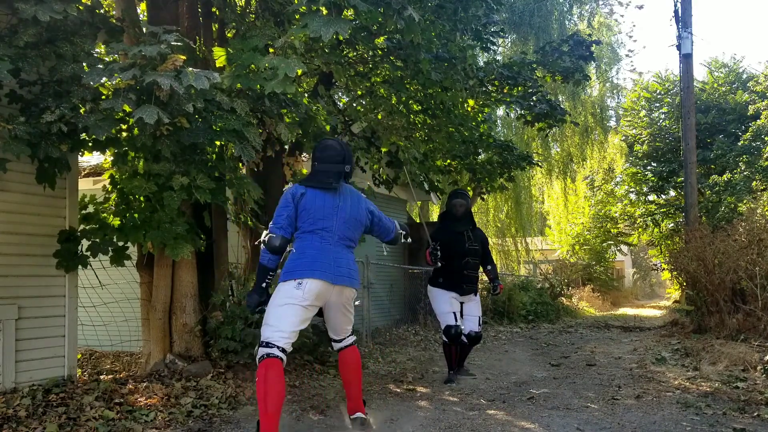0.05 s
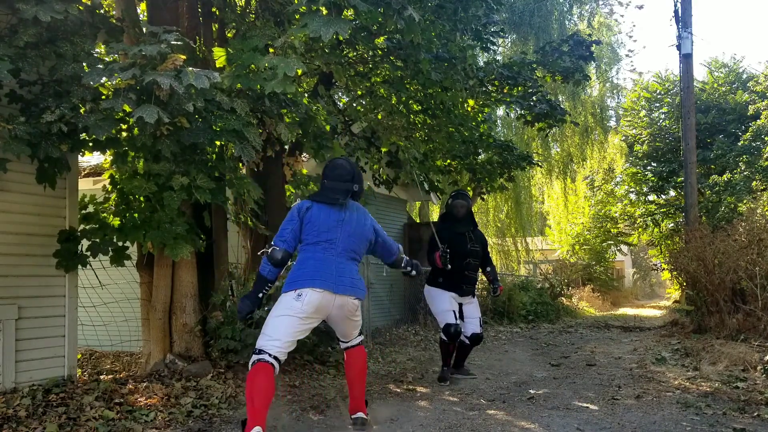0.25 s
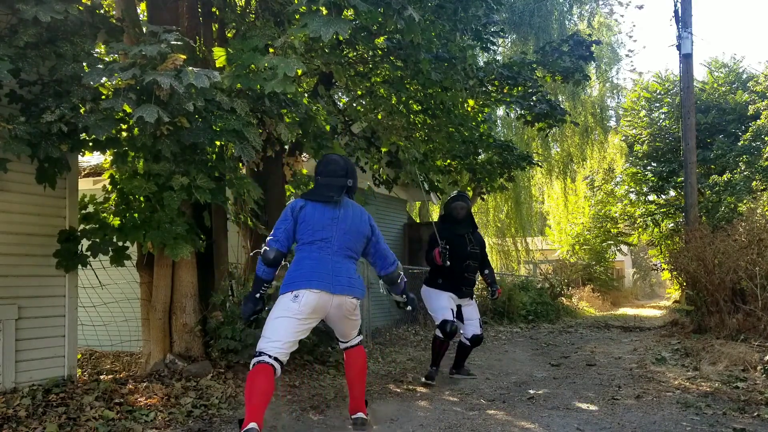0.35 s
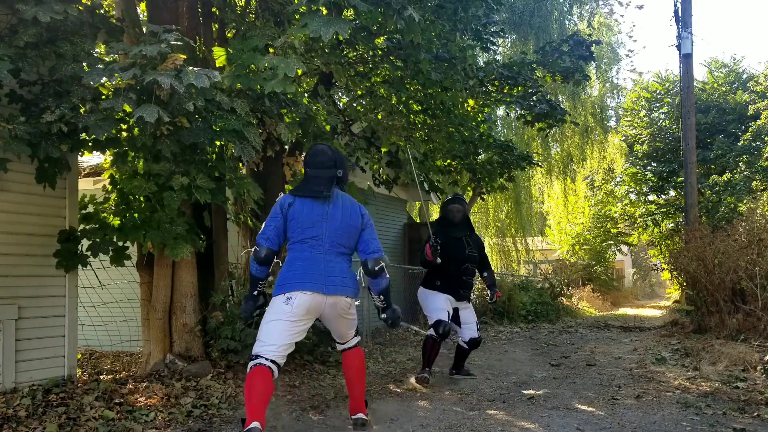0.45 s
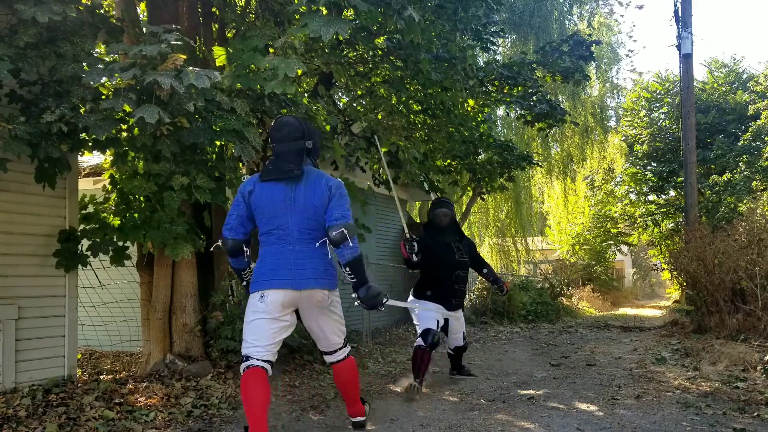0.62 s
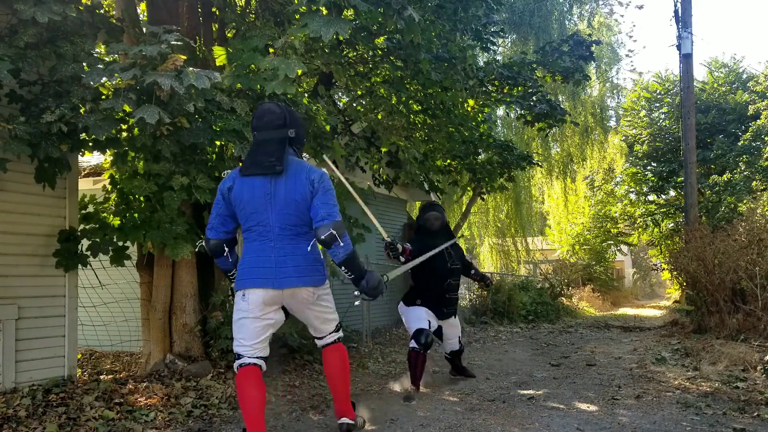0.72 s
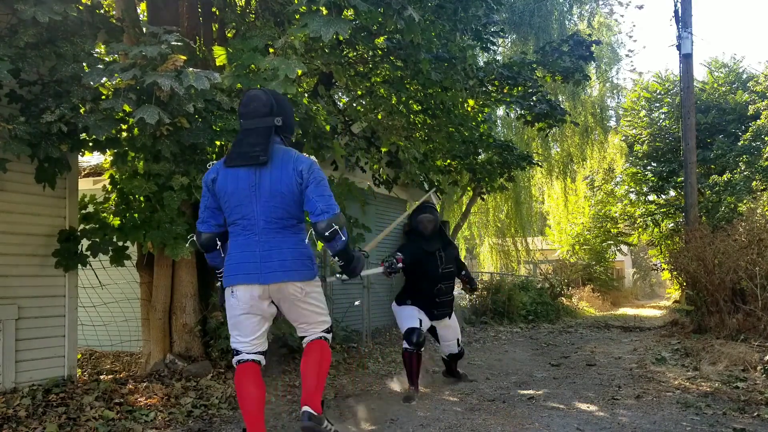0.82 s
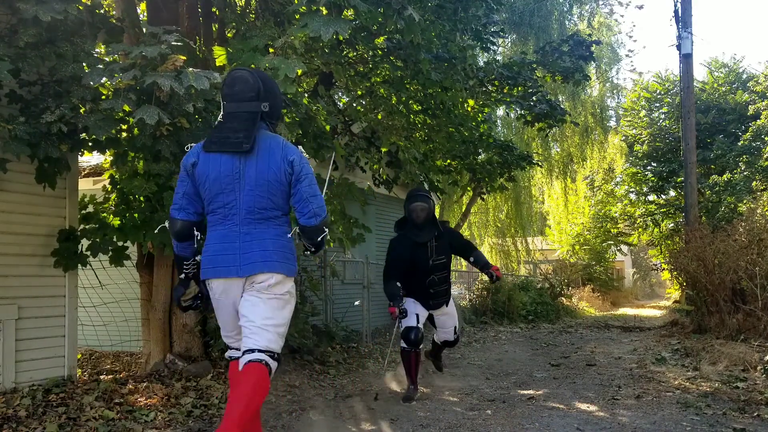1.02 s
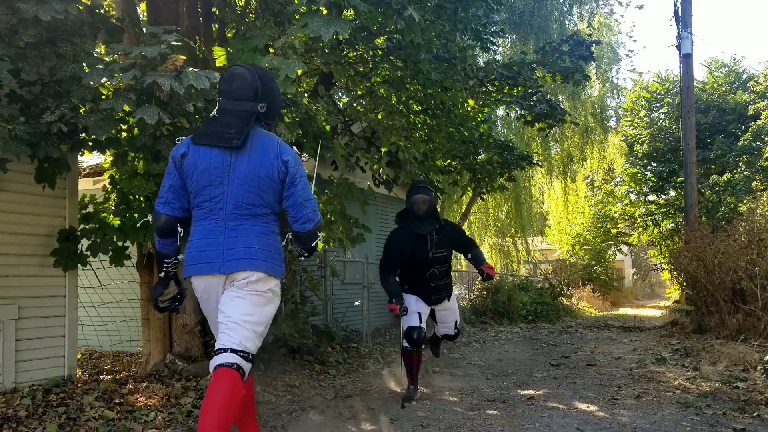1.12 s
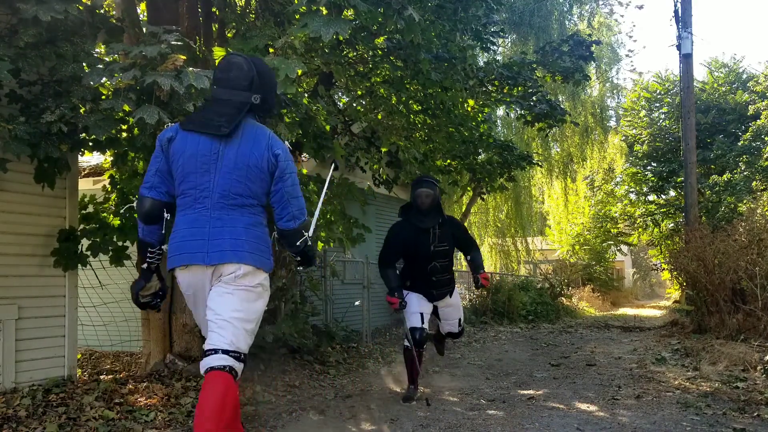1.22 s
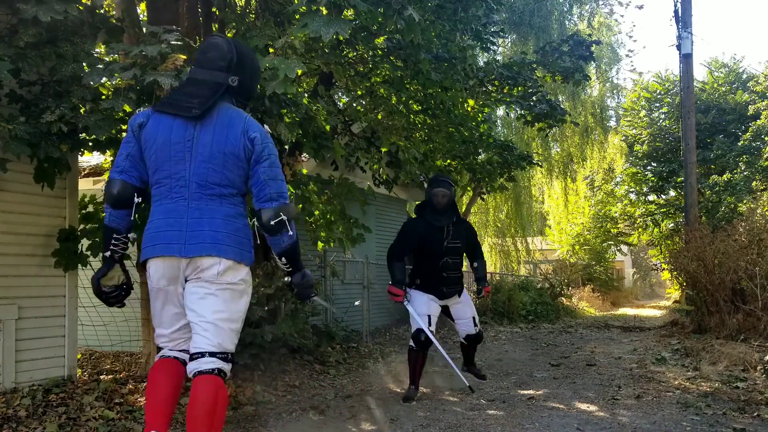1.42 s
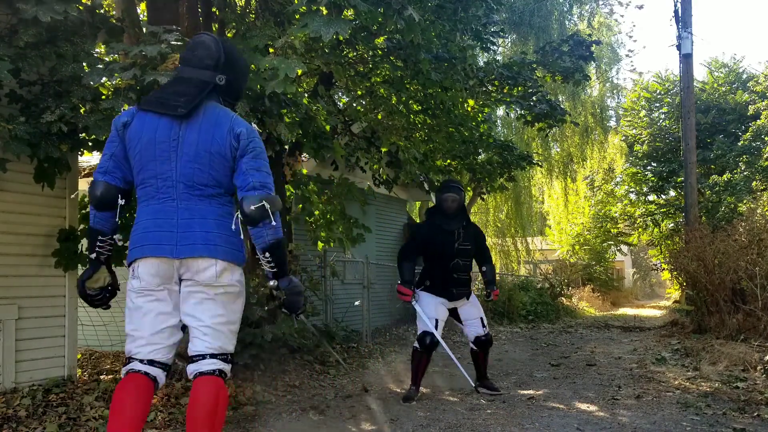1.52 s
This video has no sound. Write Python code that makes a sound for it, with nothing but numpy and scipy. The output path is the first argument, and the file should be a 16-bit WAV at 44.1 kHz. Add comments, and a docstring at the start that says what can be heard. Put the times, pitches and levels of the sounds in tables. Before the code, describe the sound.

A sword blade cracks sharply against another sword's guard, ringing briefly with a short echo. Soft footsteps then thud and scuff on gritty dirt, a little way off in a quiet yard with a faint distant hum.

```python
"""Two fencers spar in a dirt yard. A low distant hum and faint outdoor air are there throughout.
First the gear ticks and a shoe lands. At 0.2 s one blade cracks against the other's guard in a quick
run of five contacts; a padded glove thumps, the steel rings briefly, and fence, wall and trees echo.
From about 0.5 s on, shoes thud and scuff on the grit, pebbles snap and the gear ticks again."""
import sys
import numpy as np
from scipy import signal
from scipy.fft import rfft, irfft, next_fast_len
from scipy.io import wavfile
from scipy.ndimage import map_coordinates

SR = 44100
rng = np.random.default_rng(int(sys.argv[2]) if len(sys.argv) > 2 else 0)


def master(y):
    """Save y as 16-bit WAV."""
    cut = np.clip(np.atleast_2d(y).T, -1, 1)
    pcm = np.round(cut * 32767)  # scale
    wavfile.write(sys.argv[1], SR, pcm.astype(np.int16))


N = 68355
TOP_HZ = 14750  # where the treble ends
SNAP_RISE_S = 0.00058  # how fast ticks, pebbles and cracks swell


def amp(db):
    """Turn decibels into a number to multiply by."""
    return 10 ** (np.asarray(db) / 20)

def unit(x):
    """Scale x to an average strength (rms) of 1."""
    return x / np.sqrt(np.mean(x ** 2) + 1e-20)

def along(points, hz):
    """Read between the rows of a table of pitches and values."""
    pitches, values = np.transpose(points)
    return np.interp(np.log(hz + 1), np.log(pitches + 1), values)

def since(start):
    """Seconds since the start, zero before it."""
    return np.maximum(np.arange(N) / SR - start, 0)

def struck(start, rise, fade):
    """The loudness of a hit: it swells, and dies by 60 dB in `fade` seconds."""
    age = since(start)
    return (1 - np.exp(-age / rise)) * amp(-60 * age / fade)

def wobble(rate):
    """A smooth curve through `rate` random values a second."""
    return map_coordinates(rng.standard_normal(256), [since(0) * rate], mode="mirror")

def filtered(x, response):
    """Turn each pitch in x up or down by response(hz)."""
    size = next_fast_len(N + SR // 2)
    hz = np.fft.rfftfreq(size, 1 / SR)
    return irfft(rfft(x, size) * response(hz), size)[..., :N]

def panned(x, pan):
    """Move each pitch to the left (plus dB) or right (minus dB)."""
    return filtered(x, lambda hz: amp(np.outer([.5, -.5], along(pan, hz))))

def coloured(x, tone, alike, tilt_db=0):
    """Shape two signals into stereo. Likeness 1 is the same in both ears; plus tilt is brighter."""
    def response(hz):
        octaves = np.log2(np.clip(hz, SR / 100, TOP_HZ))
        gain = amp(along(tone, hz) + tilt_db * octaves) * (hz < TOP_HZ)
        width = np.arccos(np.clip(along(alike, hz), -1, 1)) / 2
        return gain * [np.cos(width), np.sin(width)]
    mid, side = filtered(x, response)
    return unit(np.array([mid + side, mid - side]))

def noise(tone, alike, tilt_db=0):
    """Stereo noise of strength 1 with this tone."""
    return coloured(rng.standard_normal((2, N)), tone, alike, tilt_db)

def echoed(x, pattern):
    """Give x a stereo pattern of echoes."""
    return signal.fftconvolve(x, unit(pattern) / np.sqrt(N), axes=1)[:, :N]


# The hum's notes, and the tone of rumble and air. Each row: pitch in Hz, level in dB.
HUM_NOTES = [(58.5, -52), (72, -50), (120, -58)]
RUMBLE_TONE = [(20, -22), (35, -25.5), (48, 5), (60, 2), (74, -8.5), (86, -1.5), (104, -1), (122, 3),
               (150, -6.5), (220, -16), (500, -59.5)]
AIR_TONE = [(30, -20), (100, 13), (250, 3), (550, -0.5), (1100, 1), (1600, -3.5), (2400, -15),
            (4000, -22.5), (6000, -26), (9000, -40), (13000, -22), (15000, -28)]
# How loud the air is. Each row: time in seconds, level in dB.
AIR_LEVEL = [(0, -50), (.15, -49.5), (.47, -51), (.8, -51), (1.2, -50.5), (1.33, -53), (1.55, -48.5)]
# How alike soft sounds are in the two ears. Each row: pitch in Hz, likeness from 0 to 1.
SOFT_ALIKE = [(60, 1), (130, 0.98), (300, 0.85), (700, 0.41), (1500, 0.083), (4000, 0.12), (14000, .1)]
# Where the background sits. Each row: pitch in Hz, left minus right in dB.
AIR_PAN = [(60, -3), (200, -3.3), (700, -6), (1300, -4.5), (2400, -11.5), (4400, -12.5), (8000, 3.5),
           (14000, 1.5)]
def outdoors():
    """A wavering far hum and rumble lie under soft air."""
    time = since(0)
    hum = sum(amp(db) * np.sqrt(2) * np.sin(2 * np.pi * hz * time + 0.78 * wobble(5.27))
              for hz, db in HUM_NOTES)
    air_db = np.interp(time, *np.transpose(AIR_LEVEL)) + 0.96 * wobble(12.3)
    air = amp(air_db) * noise(AIR_TONE, SOFT_ALIKE)
    rumble = amp(-51) * noise(RUMBLE_TONE, SOFT_ALIKE)
    return panned(hum + rumble + air, AIR_PAN)

# How long the echo lasts. Each row: pitch in Hz, seconds to fade by 60 dB.
YARD_FADE = [(200, 0.35), (1200, 0.46), (2500, 0.55), (5000, .44), (9000, 0.33), (14000, 0.29)]
# The echo's tone. Each row: pitch in Hz, level in dB.
YARD_TONE = [(200, -4), (1000, -3.5), (2400, -5), (5200, 0.5), (9000, 5.5), (14000, 2)]
def yard_echo(x):
    """Sound scatters from fence, wall and trees; the highest treble dies first."""
    hz, time, spectrum = signal.stft(rng.standard_normal((2, N)), SR, nperseg=256)
    level_db = -60 * time / along(YARD_FADE, hz)[:, None] + along(YARD_TONE, hz)[:, None]
    tail = signal.istft(spectrum * amp(level_db), SR, nperseg=256)[1][:, :N]
    build_up = 1 - np.exp(-since(0) / 0.016)
    return echoed(x, tail * build_up)

# Ticks of the gear. Each row: start in seconds, level in dB, tilt in dB per octave.
TICKS = [(.0334, -35, -1.2), (.0415, -49, 1.5), (.7265, -42, 0), (.861, -50, -2), (1.5355, -45, -1)]
# Their tone. Each row: pitch in Hz, level in dB.
TICK_TONE = [(400, -31), (1800, -1.5), (3000, 12), (4200, -3.5), (5100, 7), (8500, -15.5), (14000, -21)]
# How alike sharp sounds are in the two ears. Each row: pitch in Hz, likeness from 0 to 1.
SHARP_ALIKE = [(200, 1), (640, 0.56), (1400, 0.12), (3100, 0.36), (7000, 0.065)]
def gear_ticks():
    """The fencers' gear gives tiny, bright ticks."""
    return sum(amp(db) * struck(start, SNAP_RISE_S, fade=.011) * noise(TICK_TONE, SHARP_ALIKE, tilt)
               for start, db, tilt in TICKS)

# Pebble snaps. Each row: start in seconds, level in dB, tilt in dB per octave.
PEBBLES = [(.9805, -48, 0.5), (.994, -44, -1.5), (1.0335, -42, -1), (1.0437, -40, 2), (1.0545, -45, 3.5),
           (1.0664, -35.5, 2.8), (1.0698, -41, 0), (1.093, -43, -3.5), (1.1657, -42, 1.5)]
# The tone of grit. Each row: pitch in Hz, level in dB.
GRIT_TONE = [(300, -53), (1300, 6.5), (1950, -2.5), (2650, 2), (3500, -4), (4600, 1), (6300, -6.5),
             (9000, -14), (13000, -10.5), (15000, -22)]
def pebbles():
    """Pebbles snap under a sole."""
    return sum(amp(db) * struck(start, SNAP_RISE_S, fade=.007) * noise(GRIT_TONE, SHARP_ALIKE, tilt)
               for start, db, tilt in PEBBLES)

# Slides. Each row: middle in seconds, half length in seconds, level in dB, tilt in dB per octave.
SCUFFS = [(0.062, 0.015, -58, -8.5), (0.532, 0.065, -67.5, 6.5), (0.597, 0.0087, -44.5, -16),
          (0.68, 0.011, -56, -3.5), (0.722, 0.055, -59, -2.5), (0.927, 0.074, -67.5, 11.5),
          (1.052, 0.056, -65, 4), (1.189, 0.1, -72, 8.5)]
def scuff(middle, half_length, db, tilt, grains_per_s=2500):
    """A sole slides on grit and dry leaves, dragging a swell of tiny grains."""
    grains = (rng.random((2, N)) < grains_per_s / SR) * rng.standard_normal((2, N))
    grains *= amp(rng.standard_normal((2, N)))  # about 1 dB more unevenness
    swell = np.exp(-.5 * ((since(0) - middle) / half_length) ** 2)
    return amp(db) * swell * coloured(grains, GRIT_TONE, SOFT_ALIKE, tilt)

# Steps. Each row: start in seconds, level in dB, rise and fade in seconds, tilt in dB per octave.
STEPS = [(0.1631, -42.5, 0.0008, 0.23, -4.5), (0.567, -37.5, 0.0045, 0.13, -1.1),
         (0.667, -39, 0.015, 0.15, -2), (1.033, -38.5, 0.0065, 0.12, 2.5), (1.535, -33, 0.015, 0.12, 2)]
# The tone of a sole. Each row: pitch in Hz, level in dB.
SOLE_TONE = [(80, 6.5), (250, -3), (550, 3.5), (1200, 2.5), (2200, -11), (4000, -28), (9000, -38),
             (14000, -34.5)]
def footfalls():
    """Shoes land on the dirt with dull thuds."""
    return sum(amp(db) * struck(start, rise, fade) * noise(SOLE_TONE, SOFT_ALIKE, tilt)
               for start, db, rise, fade, tilt in STEPS)

# Where the footwork sits. Each row: pitch in Hz, left minus right in dB.
FOOT_PAN = [(100, 6), (700, -8), (1290, -0.5), (2380, -18), (4400, -8), (8120, 2.5), (14000, 6)]
def footwork():
    """The fencers move about, and the yard answers."""
    feet = footfalls() + gear_ticks() + pebbles() + sum(scuff(*row) for row in SCUFFS)
    return panned(feet + amp(-7) * yard_echo(feet), FOOT_PAN)

# Where the blow and its echoes sit. Each row: pitch in Hz, left minus right in dB.
BLOW_PAN = [(100, -4), (700, -5.5), (1290, 0), (2380, -14.5), (4400, -9.5), (8120, 6.5), (14000, 5.5)]
ECHO_PAN = [(100, -11.5), (700, -6), (1290, -9.5), (2380, -9), (4400, -5), (8120, -3.5), (14000, 4.5)]
def in_yard(direct, to_echo):
    """The direct sound is on the right, its top treble on the left; near and far echoes follow."""
    near_pattern = noise(YARD_TONE, alike=[(100, 0.0059)]) * struck(0, rise=0.0014, fade=0.19)
    echoes = amp(-1.5) * echoed(to_echo, near_pattern) + amp(-5.5) * yard_echo(to_echo)
    return panned(direct, BLOW_PAN) + panned(echoes, ECHO_PAN)

# The glove's tone. Each row: pitch in Hz, level in dB.
GLOVE_TONE = [(60, -30), (150, 3), (250, 11.5), (400, 18.5), (700, -34), (2000, -46.5)]
def glove_thump(hit):
    """The padded glove takes the blow just after the hit."""
    return amp(-24) * struck(hit + 0.0062, rise=0.0013, fade=0.044) * noise(GLOVE_TONE, SHARP_ALIKE)

# Notes of the gripped blades, then of the steel's faint free ring. Each row: pitch in Hz, level in dB.
BLADE_NOTES = [(1000, -30), (1147, -27), (1344, -23.5), (1642, -27), (1836, -27), (2120, -28), (2283, -28),
               (2493, -28), (3241, -26), (3325, -27), (4172, -29), (4635, -26), (4705, -29), (5040, -19),
               (5480, -28), (5895, -30), (7504, -32), (12974, -28), (13065, -28), (13668, -29),
               (14045, -27), (14508, -32)]
AFTER_NOTES = [(1645, -49), (1911, -52), (2414, -55), (3182, -52), (4600, -50), (4690, -48), (4716, -50),
               (5303, -44), (5345, -45), (5488, -47), (5512, -44), (5622, -48), (5860, -51), (7569, -55),
               (8753, -59)]
def steel_ring(notes, start, fade):
    """Struck steel sounds many notes at once; close ones pulse against each other."""
    # Each wave starts at a random point in the left ear, and a little off that in the right.
    shifts = rng.uniform(-np.pi, np.pi, (len(notes), 2, 1)) * [[1], [.4]]
    waves = sum(amp(db) * np.sin(2 * np.pi * hz * since(start) + phase)
                for (hz, db), phase in zip(notes, np.cumsum(shifts, axis=1)))
    return struck(start, rise=.002, fade=fade) * waves

# The crack's tone. Each row: pitch in Hz, level in dB.
CRACK_TONE = [(150, -34), (600, -19), (1000, 1), (1500, -10), (2300, -0.5), (2950, -6.5), (3300, -4.5),
              (4100, -7), (5100, -2), (6900, -8), (9200, -17.5), (13500, -5), (15000, -15.5)]
def blade_crack(start, db, tilt):
    """Steel meets steel in one short crack, with its own echoes."""
    crack = amp(db) * struck(start, SNAP_RISE_S, fade=0.017) * noise(CRACK_TONE, SHARP_ALIKE, tilt)
    return in_yard(crack, crack)

# A graze, two hard hits and a rattle. Each row: start in seconds, level in dB, tilt in dB per octave.
CONTACTS = [(0.208, -16.5, -5), (0.211, -11.5, -0.5), (0.2165, -13.5, -0.5), (0.2182, -19, -4.5),
            (0.2303, -24, -2)]
def blow():
    """A run of cracks; the hardest rings the blades, thumps the glove and leaves the steel singing."""
    hardest_s = max(CONTACTS, key=lambda row: row[1])[0]
    blades = steel_ring(BLADE_NOTES, hardest_s, fade=.065)
    singing = steel_ring(AFTER_NOTES, hardest_s, fade=.45)
    thump = glove_thump(hardest_s)
    cracks = sum(blade_crack(*row) for row in CONTACTS)
    return cracks + in_yard(thump + blades + singing, to_echo=thump + amp(-13) * blades)

def scene():
    """The blow, the footwork and the background together."""
    return blow() + footwork() + outdoors()

def record(dry):
    """Cut away the very highest treble."""
    return filtered(dry, lambda hz: 1 / np.sqrt(1 + (hz / TOP_HZ) ** 160))


dry = scene()
out = record(dry)
master(out)
```